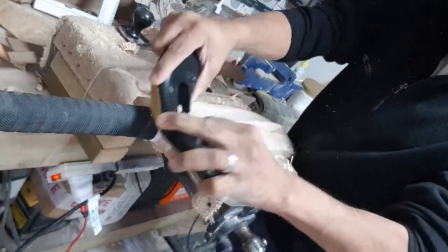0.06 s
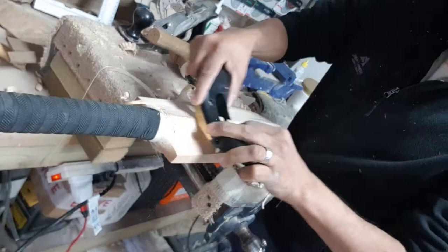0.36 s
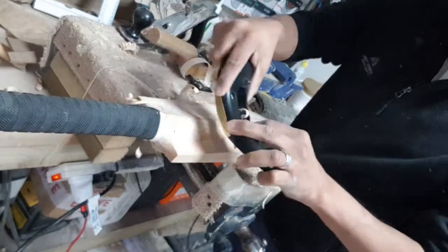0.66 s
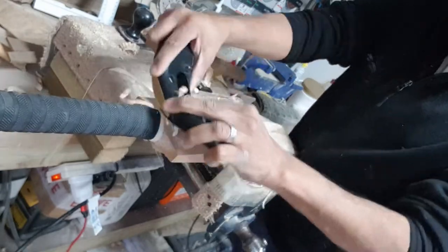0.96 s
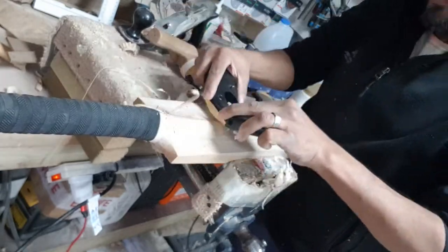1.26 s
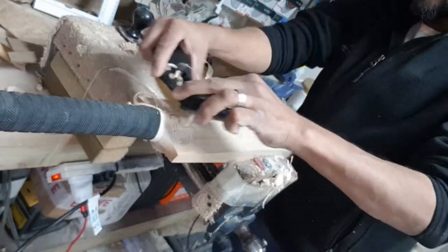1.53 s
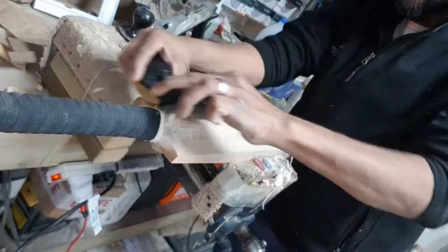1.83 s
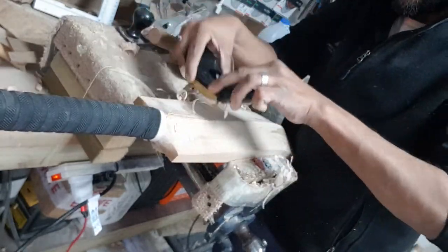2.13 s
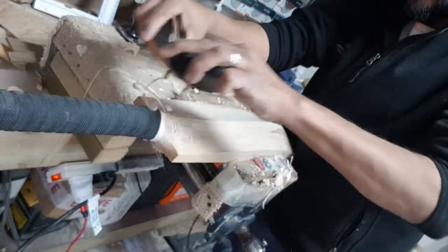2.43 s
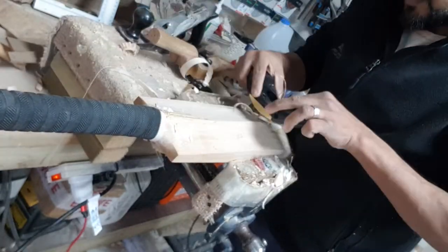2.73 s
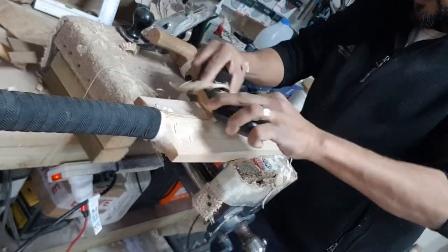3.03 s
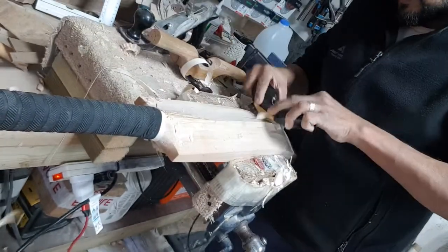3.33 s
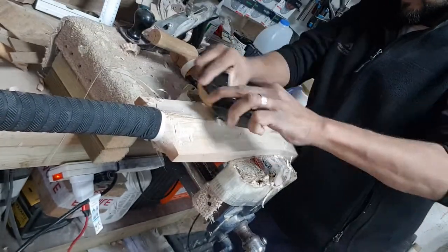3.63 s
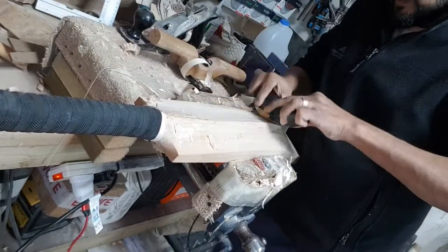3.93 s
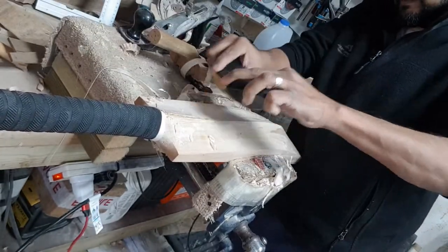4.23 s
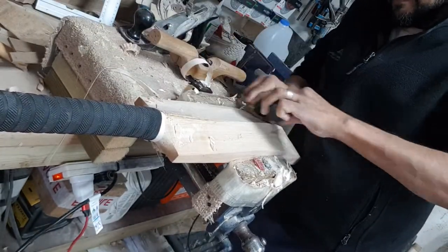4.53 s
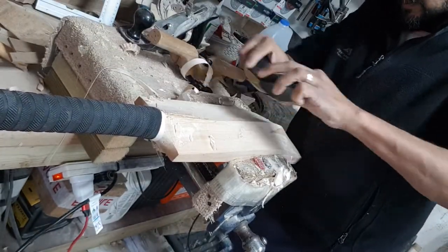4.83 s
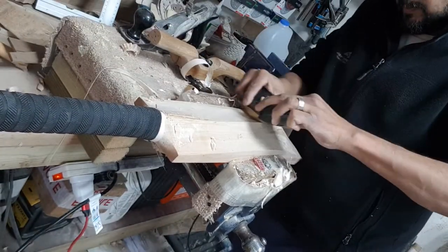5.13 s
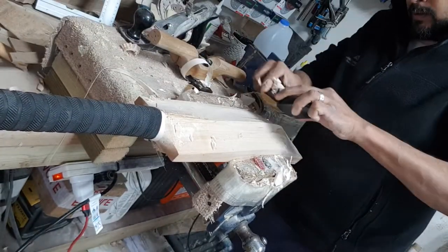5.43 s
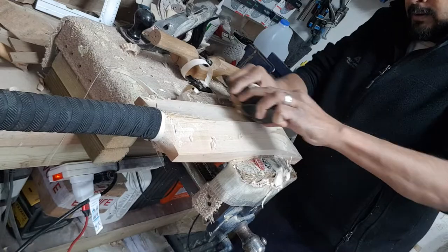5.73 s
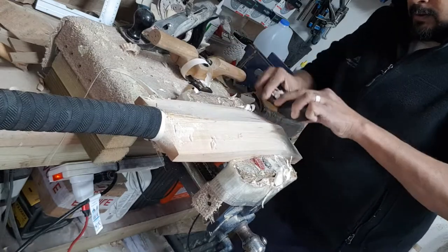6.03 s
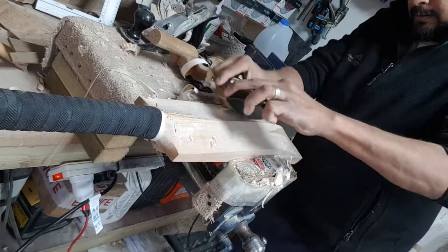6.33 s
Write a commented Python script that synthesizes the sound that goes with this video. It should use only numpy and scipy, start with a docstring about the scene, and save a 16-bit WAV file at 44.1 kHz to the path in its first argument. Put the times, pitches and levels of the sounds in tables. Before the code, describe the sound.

A small metal hand plane shaves a wooden bat clamped to a bench, about two strokes a second throughout. Each stroke begins with a hollow knock and usually a light blade rattle, followed by a short hiss and the rasp of tearing fibres. The blade sometimes snags or judders, mostly in the first half. It sounds close, in a small workshop with brief reverberation and quiet background noise.

```python
"""Planing a wooden bat

A small iron hand plane shaves a bat clamped to a bench, about two strokes a second, in a small workshop.
Each landing of the sole excites the bat's bending modes, rattles the blade and sets the bench booming.
Sliding friction then hisses while the edge tears off a shaving, now and then snagging or juddering.
The room adds a brief reverberation and a quiet background noise."""
import sys
import numpy as np
from scipy import signal
from scipy.fft import rfft, irfft, next_fast_len
from scipy.io import wavfile
from scipy.ndimage import map_coordinates

SR = 44100
rng = np.random.default_rng(int(sys.argv[2]) if len(sys.argv) > 2 else 0)


def unload_wav(signal):
    """Save mono or channel-first audio to the path in sys.argv[1] as 16-bit WAV at rate SR, clipped to [-1, 1]."""
    wavfile.write(
        sys.argv[1],
        SR,
        np.round(np.clip(np.atleast_2d(signal).T, -1, 1) * 32767).astype(np.int16),
    )


N = 289737


def amp(db):
    """Amplitude ratio of a level in decibels."""
    return 10 ** (np.asarray(db) / 20)


def unit(x):
    """Normalisation to an rms of one."""
    return x / np.sqrt(np.mean(x ** 2) + 1e-20)


def read(points, hz):
    """Interpolation on a logarithmic frequency axis."""
    f, value = np.transpose(points)
    return np.interp(np.log(hz + 1), np.log(f + 1), value)


def add(mix, s, sound):
    """Superposition of a sound at time s, which may be negative."""
    at = round(s * SR)
    sound = sound[max(-at, 0):]
    part = mix[max(at, 0):][:len(sound)]
    part += sound[:len(part)]


def colour(x, points):
    """Zero-phase filtering by a curve of f/Hz, gain/dB."""
    size = next_fast_len(len(x))
    gain = amp(read(points, np.fft.rfftfreq(size, 1 / SR)))
    return irfft(rfft(x, size) * gain, size)[:len(x)]


def ring(x, modes):
    """Forced response of damped modes (f/Hz, bandwidth/Hz, level/dB); equal level is equal energy."""
    t = np.arange(2048) / SR
    response = sum(amp(db) * np.sqrt(width) * np.exp(-np.pi * width * t)
                   * np.sin(2 * np.pi * hz * t) * (-1) ** k for k, (hz, width, db) in enumerate(modes))
    return signal.oaconvolve(x, response)[:len(x)]


def crackle(size, per_s, spread_db):
    """Shot noise: random impulses of uneven strength."""
    clicks = rng.standard_normal(size) * (rng.random(size) < per_s / SR)
    return unit(clicks * amp(spread_db * np.minimum(rng.exponential(1, size), 4)))


def waver(per_s):
    """Random modulation of unit rms, linear between knots."""
    knots = rng.standard_normal(8000)
    return unit(np.interp(np.arange(N) / SR * per_s, np.arange(len(knots)), knots))


def burst(t, length, rise, fall):
    """Envelope of exponential rise, hold and exponential decay; times in seconds."""
    return (1 - np.exp(-t / rise)) * np.exp(-np.maximum(t - length, 0) / fall)


# Coherence between the microphones: f/Hz, correlation
COHERENCE = [(60, 0.94), (250, 0.87), (550, 0.46), (1100, -0.36), (3000, 0.17), (12000, -0.023)]
def diffuse(noises):
    """A diffuse field is coherent at two close points only at long wavelengths."""
    a, b = rfft(noises)
    size = noises.shape[-1]
    same = np.clip(read(COHERENCE, np.fft.rfftfreq(size, 1 / SR)), -1, 1)
    shared, apart = a * np.sqrt((1 + same) / 2), b * np.sqrt((1 - same) / 2)
    return irfft([shared + apart, shared - apart], size)


# Background spectrum: f/Hz, level/dB
AIR = [(15, -33.5), (25, -18.5), (158, 6.5), (231, -4.5), (604, -6), (691, -9.5), (1960, -22.5),
       (2780, -30.5), (5280, -36), (7280, -29.5), (10300, -41), (13800, -35.5), (15000, -51)]
def air(level_db=-54.5, waver_db=0.73):
    """Diffuse noise fills the room, its level wavering slightly."""
    noises = np.array([unit(colour(rng.standard_normal(N), AIR)) for _ in range(2)])
    return amp(level_db) * diffuse(noises) * amp(waver_db * waver(per_s=7.8))


# Sole impacts: t/s, level/dB, contact cutoff/Hz, place (0 handle, 1 toe), clack/dB, bench/dB
LANDINGS = [(-.02, -23, 700, .3, -22.5, -29.5), (.385, -10.5, 1500, 0.31, -14.5, -25),
            (0.846, -12, 890, 0.27, -18, -25.5), (1.313, -20, 885, 0.42, -26, -40),
            (1.748, -21.5, 900, 0.48, -26, -35), (2.261, -13, 607, 0.37, -22, -29.5),
            (2.893, -22.5, 350, 0.68, -42, -48.5), (3.11, -28.5, 274, 0.074, -36.5, -43),
            (3.432, -13.5, 385, 0.67, -22.5, -29), (4.013, -9, 637, 0.75, -18, -28),
            (4.521, -9.5, 650, 0.61, -19, -22), (5.078, -9, 990, 0.65, -13, -27),
            (5.635, -12, 1130, 0.68, -15, -32), (6.174, -13, 684, 0.53, -19, -28)]
# Modes of the clamped bat, plus a low bench boom near 98 Hz:
# f/Hz, T60/s, level struck at the handle/dB, at the toe/dB
KNOCK_MODES = [(98, 0.22, -15.5, -18.5), (129.8, 0.12, -4.5, -9), (180.2, 0.12, 10, -11),
               (260.8, 0.1, 0, 2), (295.6, 0.092, -3, 3), (399.2, 0.24, -14, -2.5), (479, 0.13, 0, -16),
               (553, 0.11, -0.5, -21.5), (580, 0.13, 12, -19), (637.7, 0.11, 0.5, -10),
               (718, 0.027, -8, -1), (850, 0.25, -12, -31), (1006, 0.065, -8, -14.5),
               (1183, 0.099, -5, -33.5), (1260, 0.18, -3, -32), (1590, 0.047, -10.5, -9.5),
               (2120, 0.13, -23.5, -6)]
# Contact noise spectrum: f/Hz, level/dB
CLACK = [(60, -45), (150, -22), (300, -0.5), (430, 1.5), (650, 1.5), (900, -7.5), (1400, -10),
         (2000, -14.5), (3000, -26.5), (5000, -29), (9000, -32), (15000, -66)]
def knocks(travel_s=0.0012, rise_cycles=0.9, stiffen=0.19, contact_s=0.0047):
    """Impact and dispersion: under a short clack the high modes speak first, so the pitch falls."""
    out, t = np.zeros(N), np.arange(16384) / SR
    for s, db, cutoff_hz, place, clack_db, _ in LANDINGS:
        wood = np.zeros(len(t))
        for hz, t60, handle_db, toe_db in KNOCK_MODES:
            age = np.maximum(t - travel_s * np.sqrt(400 / hz), 0)  # low bending waves travel slower
            height = amp(handle_db + place * (toe_db - handle_db)) / (1 + (hz / cutoff_hz) ** 2)
            envelope = (1 - np.exp(-age * hz / rise_cycles)) * np.exp(-np.log(1000) * age / t60)
            # the pressing sole briefly stiffens the wood
            cycles = hz * (age + stiffen * contact_s * (1 - np.exp(-age / contact_s)))
            wood += height * envelope * np.sin(2 * np.pi * cycles)
        stretch = (cutoff_hz / 824) ** 0.083  # a sharper contact clacks higher
        spectrum = [(hz * stretch, level) for hz, level in CLACK]
        clack = unit(colour(rng.standard_normal(len(t)), spectrum))
        clack *= burst(t, 0, rise=0.0015, fall=0.018)
        add(out, s, amp(db) * wood + amp(clack_db) * clack)
    return out


def bench(hz=61, t60=0.46, rise_s=0.027):
    """Damped vibration: the bench's lowest mode booms after each landing and judder."""
    out, t = np.zeros(N), np.arange(SR) / SR
    boom = np.sin(2 * np.pi * hz * t) * burst(t, 0, rise_s, fall=t60 / np.log(1000))
    for s, *_, db in LANDINGS + JUDDERS:
        add(out, s, amp(db) * boom)
    return out


# Reverberation time: f/Hz, T60/s
ROOM_T60 = [(100, 0.53), (400, 0.0165), (1500, 0.3137), (5000, 0.08), (14000, 0.33)]
# Strength of the reflections: f/Hz, level/dB
ROOM_LEVEL = [(100, -9), (400, -2.5), (1200, -6), (4000, -0.5), (12000, -3)]
def reflections(first_s=0.0015, size=24576):
    """Impulse response of bench and near walls: dense echoes, each band decaying at its own rate."""
    taps = rng.standard_normal((2, size)) * (np.arange(size) > first_s * SR)
    hz, t, bands = signal.stft(diffuse(taps), SR, nperseg=256)
    decay = np.exp(-np.log(1000) * t / read(ROOM_T60, hz)[:, None])
    energy = np.mean(decay ** 2, 1, keepdims=True) * size
    decay *= amp(read(ROOM_LEVEL, hz))[:, None] / np.sqrt(energy)
    return signal.istft(bands * decay, SR, nperseg=256)[1]


def reverberation(x, count=4, cycle_hz=2.7):
    """Echo paths change as the plane moves: a cyclic crossfade of room responses."""
    phase = 2 * np.pi * np.arange(N) / SR * cycle_hz
    shares = [np.maximum(np.cos(phase + 2 * np.pi * k / count), 0) for k in range(count)]
    return sum(signal.oaconvolve((x * share)[None], reflections(), axes=1)[:, :N] for share in shares)


# Blade rattling in its seat: t/s, level/dB, duration/s, gain of modes above 10 kHz/dB
RATTLES = [(-.012, -42, 0.025, -10), (0.395, -30, 0.0096, 0), (0.848, -41, 0.031, -3),
           (1.322, -27.5, 0.019, -2), (1.752, -34, 0.0079, -17.5), (2.273, -29.5, 0.016, -3),
           (3.443, -31.5, 0.021, -10), (4.011, -30.5, 0.028, -14), (4.529, -30.5, 0.009, -16),
           (5.093, -28, 0.018, -3.5), (5.633, -39.5, 0.035, -13.5), (6.183, -27, 0.013, -2.5)]
# Modes of blade and cap: f/Hz, bandwidth/Hz, level/dB
BLADE_MODES = [(2570, 220, -6.5), (4500, 100, -6), (4900, 390, -8.5), (5780, 860, -3), (7940, 200, -2),
               (8610, 420, -5.5), (11725, 92, 6.5), (12130, 120, 1.5), (12110, 190, 0.5)]
def rattles(buzz_db=-15, detune=0.015):
    """Repeated impacts: a quick run of metal contacts rings the blade at most landings."""
    out, t = np.zeros(N), np.arange(6000) / SR
    for s, db, length, lift_db in RATTLES:
        contacts = crackle(len(t), per_s=6900, spread_db=4.5)
        seating = 1 + detune * rng.uniform(-0.6, 1, len(BLADE_MODES))  # the blade never sits the same
        modes = [(hz * seat, width, level + lift_db * (hz > 1e4))
                 for (hz, width, level), seat in zip(BLADE_MODES, seating)]
        steel = unit(ring(contacts, modes))
        buzz = amp(buzz_db) * unit(ring(contacts, [(2350, 2800, 0)]))
        add(out, s, amp(db) * (steel + buzz) * burst(t, length, rise=0.0014, fall=0.0085))
    return out


def push(start, length, db, swell_db, attack_s, release_db_per_s):
    """Envelope of one cut: logistic onset, a slope in level, then exponential decay."""
    t = np.arange(N) / SR - start
    along = np.clip(t / length, 0, 1)
    onset = 1 / (1 + np.exp(np.clip(-4 * (t / attack_s + .5), -60, 60)))
    return onset * amp(db + swell_db * (along - .5) - release_db_per_s * np.maximum(t - length, 0))


# Cuts: t/s, duration/s, sliding/dB, tearing/dB, shaking/dB, sliding swell/dB, tearing swell/dB
STROKES = [(0.065, 0.052, -43, -34, -34.5, -7.5, -12.5), (0.487, 0.12, -46, -40.5, -40.5, -9.5, -18),
           (0.932, 0.1, -43.5, -33.5, -43, 5, -6), (1.416, 0.086, -38, -31.5, -34, 3.5, -6),
           (1.855, 0.1, -43.5, -41, -36, 1, -8.5), (2.328, 0.068, -44, -48, -37.5, 9.5, 15),
           (3.024, 0.041, -45, -37, -43.5, 3, -6), (3.545, 0.13, -44, -32.5, -39.5, -0.5, -8),
           (4.094, 0.12, -45, -42, -38.5, -7.5, -11), (4.589, 0.14, -46.5, -43.5, -37.5, -9.5, -9.5),
           (5.159, 0.13, -43.5, -37, -36.5, 2, -4), (5.713, 0.13, -46, -42, -39.5, -5.5, -13),
           (6.253, 0.112, -45, -40, -40, -2.5, -16.5)]
# The sole skimming back: t/s, duration/s, level/dB
RETURNS = [(1.112, 0.084, -57), (1.562, 0.21, -51.5), (3.693, 0.24, -59.5)]
# Envelopes of sole, edge and bat: attack/s, release/(dB/s)
SOLE = (0.053, 272)
EDGE = (0.026, 424)
BODY = (0.047, 230)
def strokes(shake_swell_db=-1.5):
    """Superposed strokes give the envelopes of sliding sole, tearing edge and shaking bat."""
    slide, tear, shake = np.zeros((3, N))
    for s, length, slide_db, tear_db, shake_db, slide_swell_db, tear_swell_db in STROKES:
        slide += push(s, length, slide_db, slide_swell_db, *SOLE)
        tear += push(s, length, tear_db, tear_swell_db, *EDGE)
        shake += push(s, length, shake_db, shake_swell_db, *BODY)
    for s, length, db in RETURNS:
        add(slide, s, amp(db) * signal.windows.hann(round(length * SR)))
    return slide, tear, shake


# Modes of sole and shaving on the wood: f/Hz, bandwidth/Hz, level at the handle/dB, at the toe/dB
CUT_MODES = [(745, 125, -22, -9.5), (947, 180, -9.5, -5.5), (1340, 285, -1, 8), (1505, 150, -1, -6),
             (1786, 270, -5.5, 3), (2354, 600, -2, 2.5), (2996, 320, -2, -4.5), (3770, 600, -8, -17.5)]
# Path of the work: t/s, place (0 handle, 1 toe)
WORK_PLACE = [(0.5, 0.2), (1.4, 0.48), (2.3, 0.5), (3.0, 0.7), (6.3, 0.95)]
def shaving(fibres):
    """Modal excitation depends on position: the balance shifts as the work moves toward the toe."""
    toe = np.clip(np.interp(np.arange(N) / SR, *np.transpose(WORK_PLACE)), 0, 1)
    near_handle = unit(ring(fibres, [(hz, width, db) for hz, width, db, _ in CUT_MODES]))
    near_toe = unit(ring(fibres, [(hz, width, db) for hz, width, _, db in CUT_MODES]))
    return (1 - toe) * near_handle + toe * near_toe


# Spectra of the sole's hiss, its treble fizz and the shaking bat: f/Hz, level/dB
HISS = [(500, -43.5), (2000, -3.5), (4000, -1.5), (5500, -3), (6600, -1.5), (7800, -0.5), (9000, -12.5),
        (10500, -15), (14500, -10)]
FIZZ = [(5000, -34), (8500, 2), (10500, 1), (12000, 6), (13500, 4), (15000, -12.5)]
SHAKE = [(40, -18.5), (62, 10), (90, -15.5), (140, 1.5), (200, -0.5), (300, -9), (400, -3.5), (470, -15),
         (620, -5.5), (800, -10.5), (1100, -22.5), (1800, -42), (5000, -67)]
def planing(hiss_db=-2, fizz_db=-6, tear_db=-2, shake_db=-2, fizz_growth=1.66, firm_db=-42):
    """Friction and fracture: the sole rubs, fibres snap, and the uneven grain modulates every layer."""
    slide, tear, shake = strokes()
    grain = amp(0.97 * waver(per_s=310) + 0.78 * waver(per_s=50))
    rub = unit(grain * crackle(N, per_s=9000, spread_db=5.5))
    bundles = amp(2.4 * waver(per_s=130))  # fibres break in groups
    fibres = unit(grain * bundles * crackle(N, per_s=3500, spread_db=1.0))
    dust = unit(grain * crackle(N, per_s=5800, spread_db=4.5))
    hiss = amp(hiss_db) * slide * unit(colour(rub, HISS))
    brightness = (slide / amp(firm_db)) ** fizz_growth  # a firmer stroke is brighter
    fizz = amp(fizz_db + firm_db) * brightness * unit(colour(dust, FIZZ))
    tearing = amp(tear_db) * tear * shaving(fibres)
    body = amp(shake_db) * shake * unit(colour(fibres, SHAKE))
    return hiss + fizz + tearing + body


# The edge catching on the grain: t/s, level/dB, duration/s, f/Hz, bandwidth/Hz
SNAGS = [(0.052, -34.5, 0.018, 3160, 600), (0.067, -32, 0.015, 2900, 200),
         (0.504, -29.5, 0.0083, 3120, 198), (0.532, -55, 0.015, 3150, 120), (0.95, -31, 0.029, 1860, 1090),
         (1.409, -36, 0.017, 3080, 2200), (1.849, -36.5, 0.023, 2180, 600),
         (1.929, -31, 0.0067, 5600, 4040), (3.009, -45, 0.014, 1270, 195),
         (4.124, -39.5, 0.007, 3500, 4000), (5.873, -37.5, 0.014, 1070, 1210)]
def snags(rasp_db=-12, chatter_hz=190, chatter_depth=0.38):
    """Resonance driven by fracture: breaking fibres excite a brief squeak inside a rasp."""
    out, t = np.zeros(N), np.arange(4096) / SR
    skips = 1 + chatter_depth * np.cos(2 * np.pi * chatter_hz * t)  # the edge skips over the grain
    for s, db, length, hz, width in SNAGS:
        fibres = skips * crackle(len(t), per_s=2500, spread_db=4.0)
        squeak = unit(ring(fibres, [(hz, width, 0)]))
        rasp = amp(rasp_db) * unit(ring(fibres, [(1505, 83, 4), (2390, 700, 13), (2950, 550, 2.5)]))
        add(out, s, amp(db) * (squeak + rasp) * burst(t, length, rise=0.0008, fall=0.008))
    return out


# Blade judders during a cut: t/s, level/dB, duration/s, f/Hz, bench/dB
JUDDERS = [(0.104, -26, 0.015, 604, -41), (0.514, -32.5, 0.011, 596, -43), (0.554, -30, 0.016, 596, -28),
           (0.98, -31.5, 0.011, 642, -55), (1.02, -36, 0.017, 640, -34.5),
           (1.453, -27.5, 0.019, 599, -29.5), (1.89, -33, 0.011, 582, -50.5), (1.921, -24, 0.014, 598, -44),
           (1.94, -30, 0.012, 542, -21), (2.373, -32, 0.02, 572, -99), (2.416, -33, 0.017, 614, -61),
           (4.201, -42, 0.0084, 670, -55), (4.698, -44.5, 0.045, 631, -62)]
def judders(linewidth_hz=30, thump_db=-8, grit_db=-17):
    """Stick-slip oscillation of the edge: an uneven buzz in the bat, with grit at every slip."""
    out, t = np.zeros(N), np.arange(4096) / SR
    for s, db, length, hz, _ in JUDDERS:
        phase_drift = np.cumsum(rng.standard_normal(len(t))) * np.sqrt(2 * np.pi * linewidth_hz / SR)
        slips = np.sin(2 * np.pi * hz * t + phase_drift)
        thump = unit(ring(rng.standard_normal(len(t)), [(180, 120, 5.5), (342, 130, 2)]))
        grit = unit(colour(crackle(len(t), per_s=16000, spread_db=6.5) * (1 + slips), HISS))
        buzz = slips + amp(thump_db) * thump + amp(grit_db) * grit
        add(out, s, amp(db) * buzz * burst(t, length, rise=0.0012, fall=0.0051))
    return out


def scene(direct_db=-1, lag_ms=0.12, sway_ms=0.11):
    """Direct and reverberant fields add; the right microphone's lag wanders as the plane moves."""
    work = knocks() + rattles() + judders() + snags() + planing()
    lag_samples = (lag_ms + sway_ms * waver(per_s=5)) * SR / 1000
    direct = np.array([work, map_coordinates(work, [np.arange(N) - lag_samples])])
    return amp(direct_db) * direct + reverberation(work) + bench() + air()


# Microphone balance: f/Hz, left minus right/dB
BALANCE = [(60, 1), (120, 2.5), (240, 1), (480, 1), (950, 3), (1890, 3), (3770, 2.5), (7520, 5),
           (11500, -5.5), (15000, -4)]
def record(dry, cutoff_hz=14800):
    """Frequency response: each microphone colours the sound, and a low-pass limits the band."""
    channels = np.array([colour(x, [(hz, side * db / 2) for hz, db in BALANCE])
                         for x, side in zip(dry, (1, -1))])
    lowpass = signal.firwin(401, cutoff_hz, window=("kaiser", 9), fs=SR)
    return signal.oaconvolve(channels, lowpass[None], "same")


dry = scene()
out = record(dry)
unload_wav(out)
```